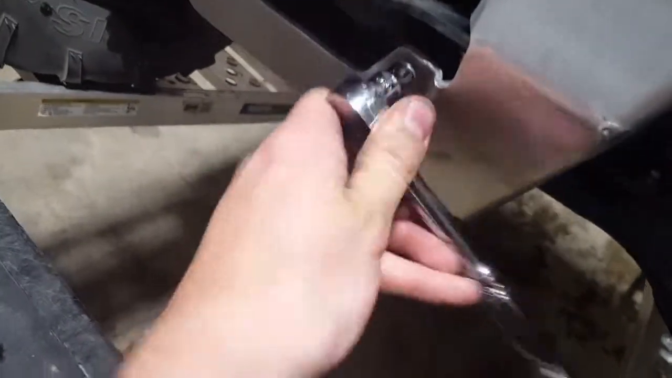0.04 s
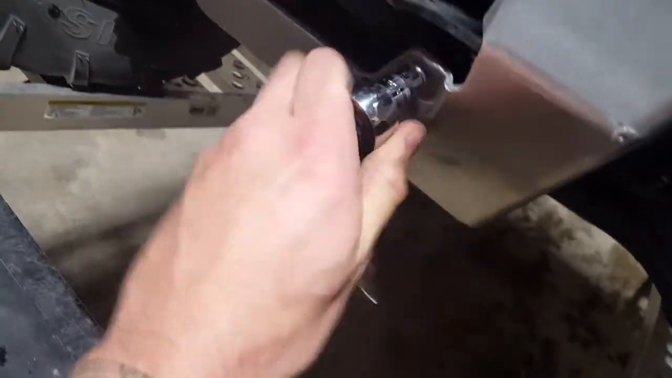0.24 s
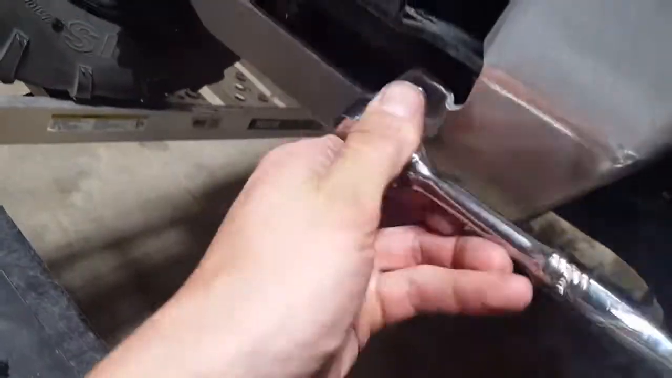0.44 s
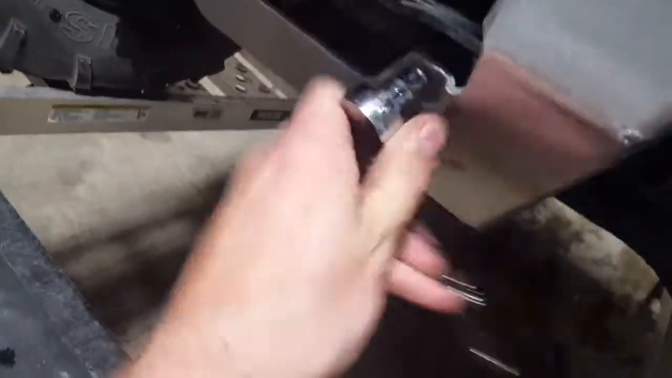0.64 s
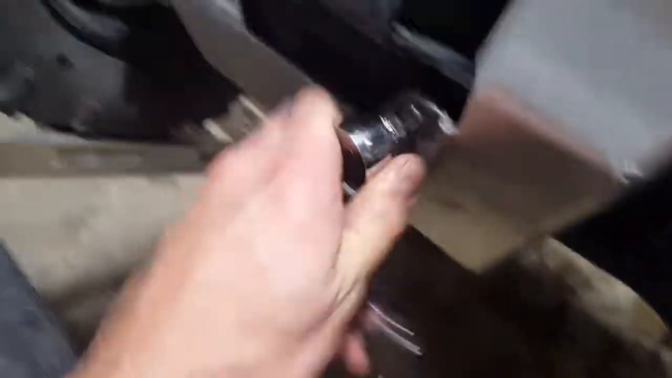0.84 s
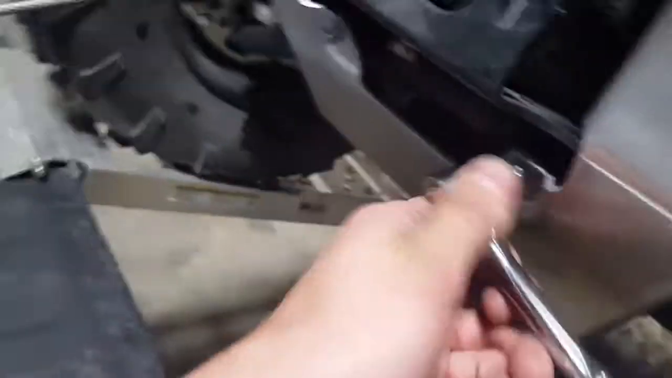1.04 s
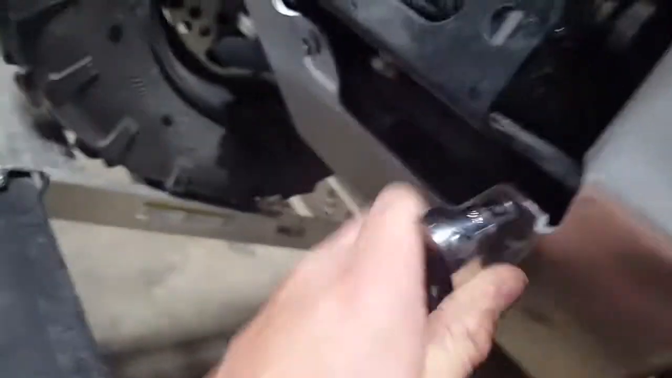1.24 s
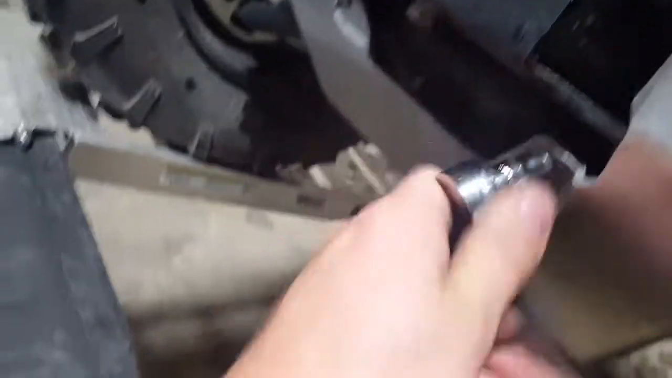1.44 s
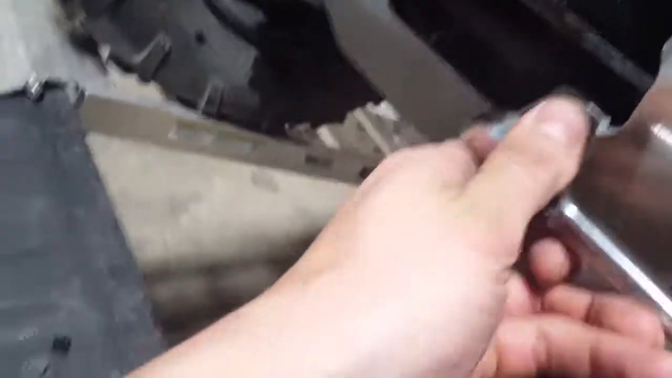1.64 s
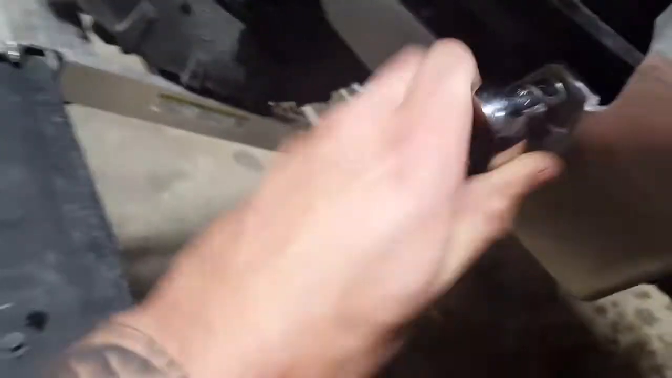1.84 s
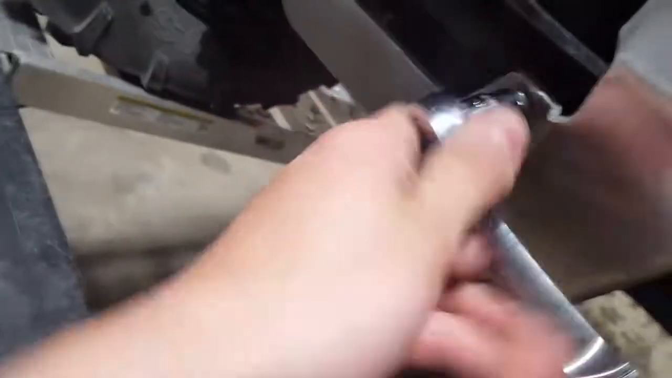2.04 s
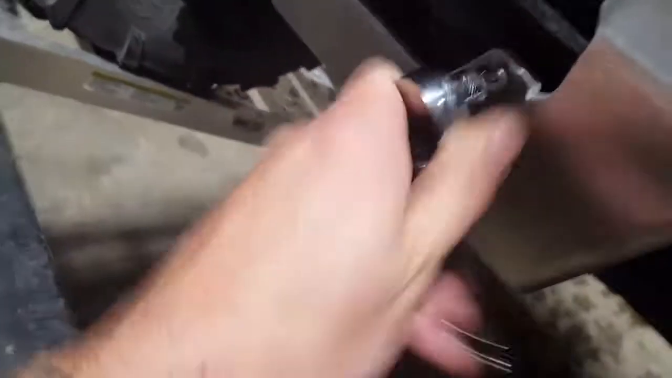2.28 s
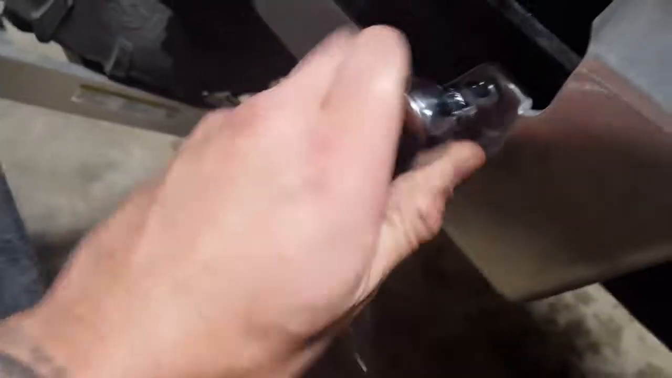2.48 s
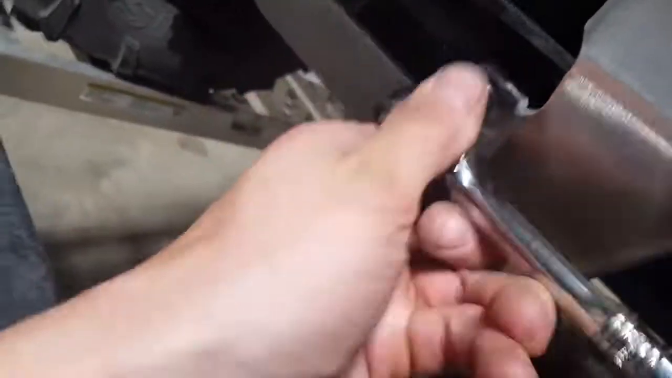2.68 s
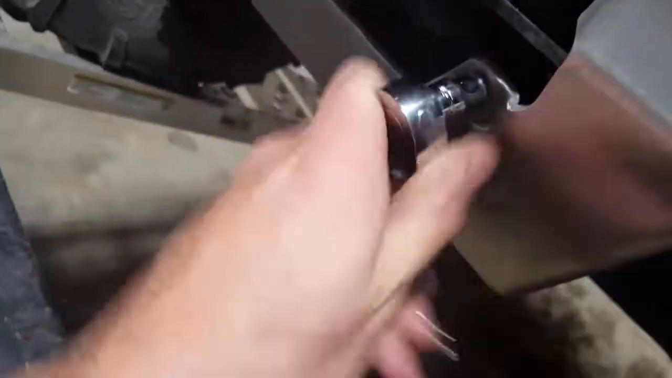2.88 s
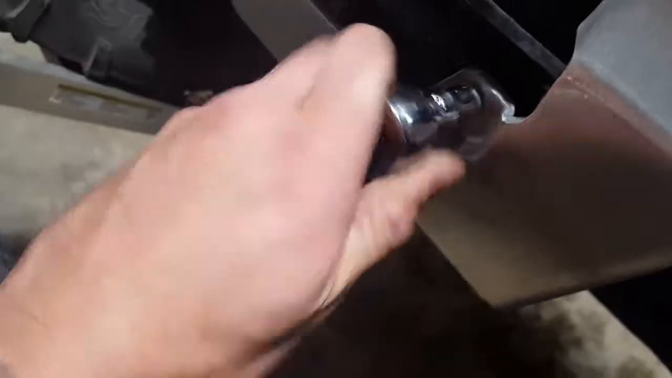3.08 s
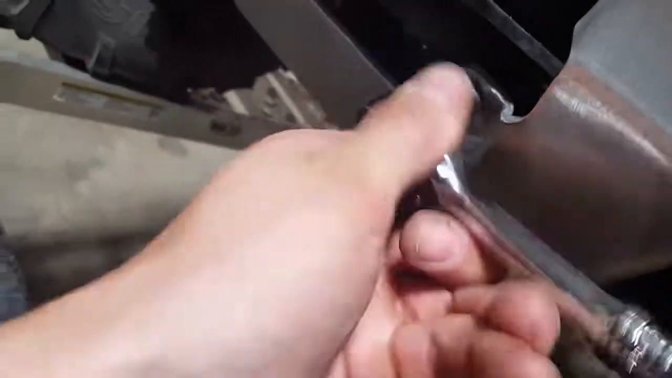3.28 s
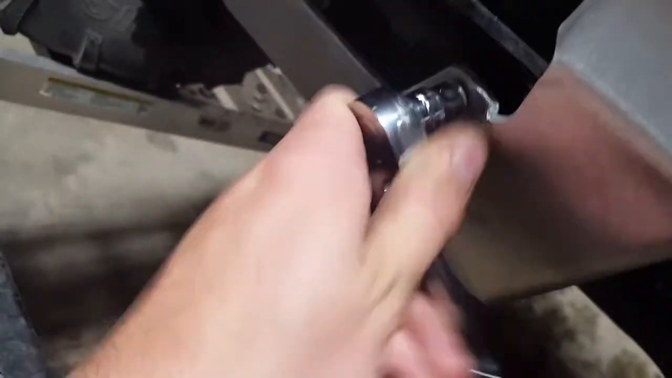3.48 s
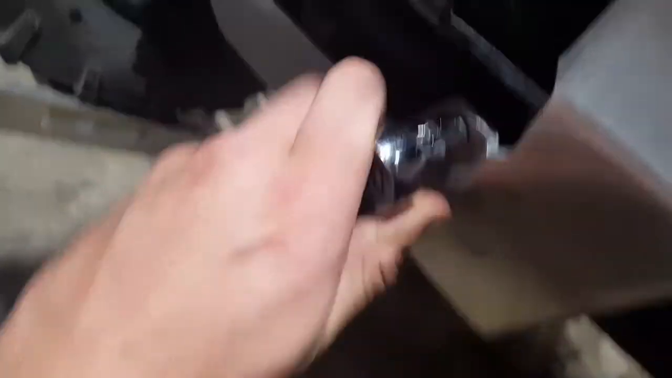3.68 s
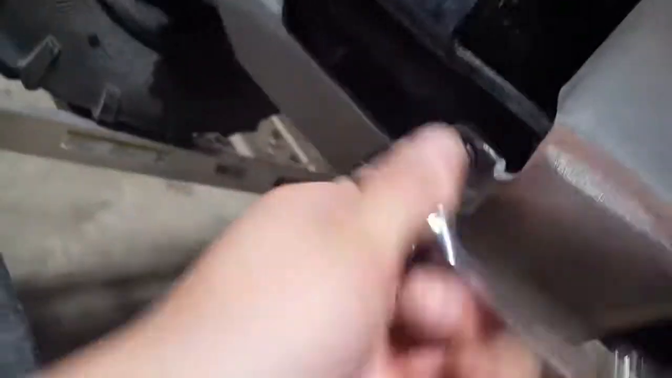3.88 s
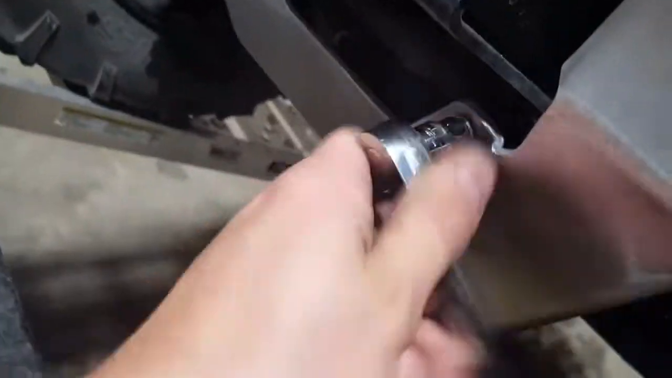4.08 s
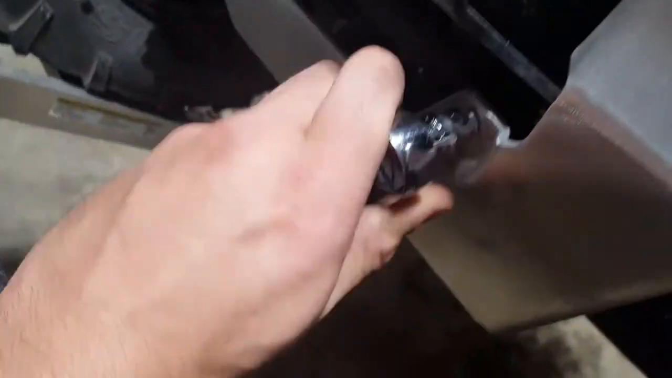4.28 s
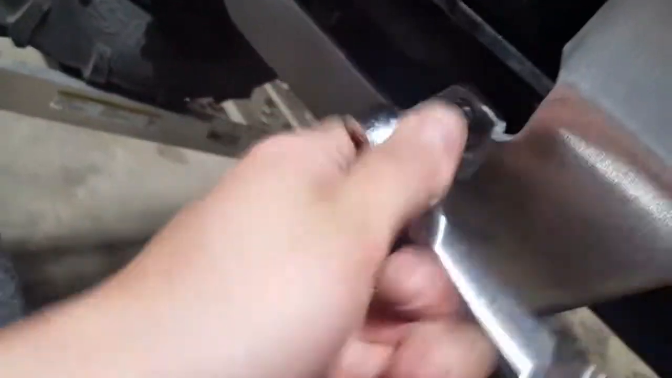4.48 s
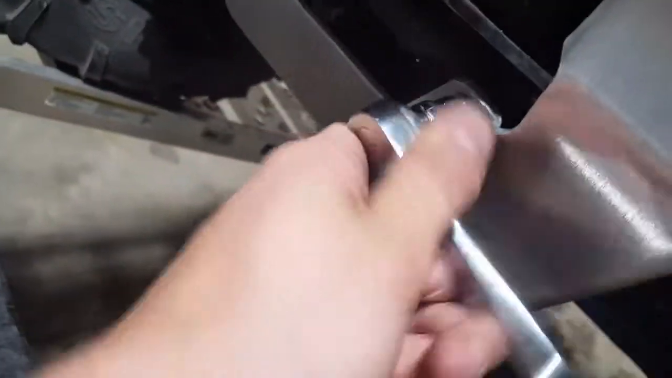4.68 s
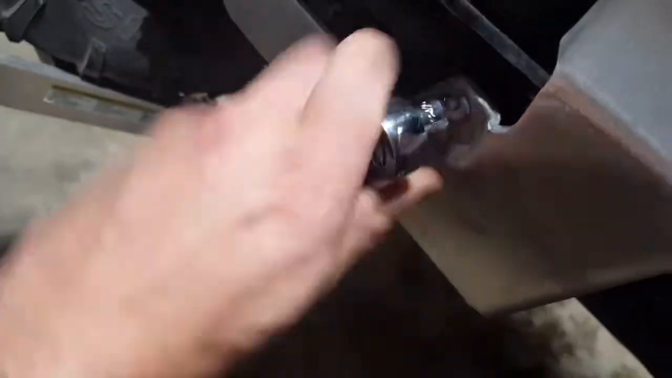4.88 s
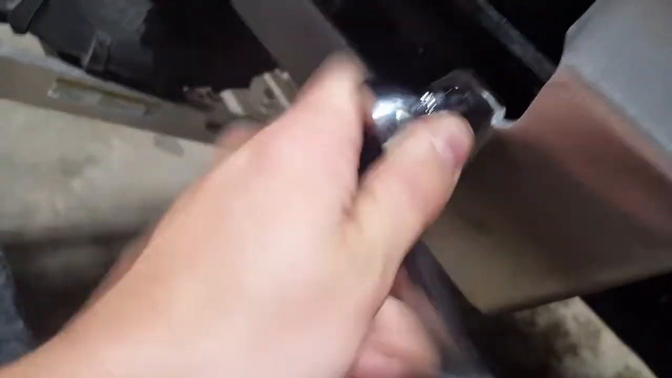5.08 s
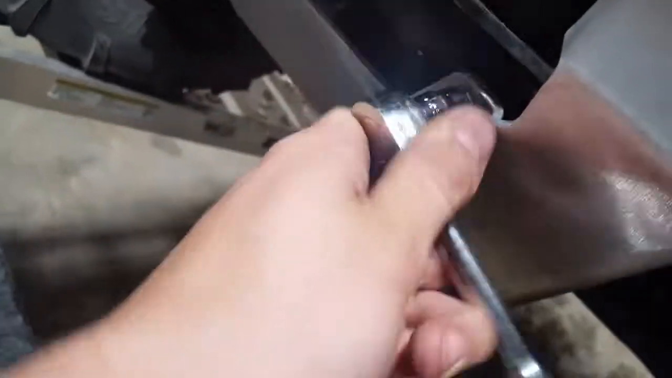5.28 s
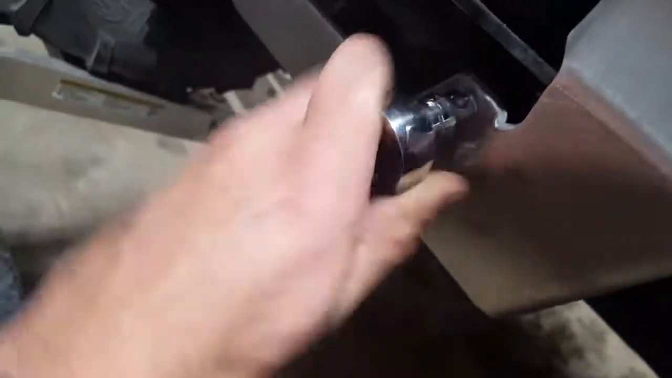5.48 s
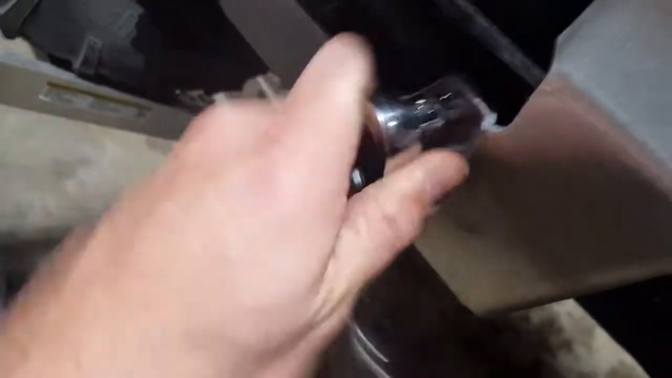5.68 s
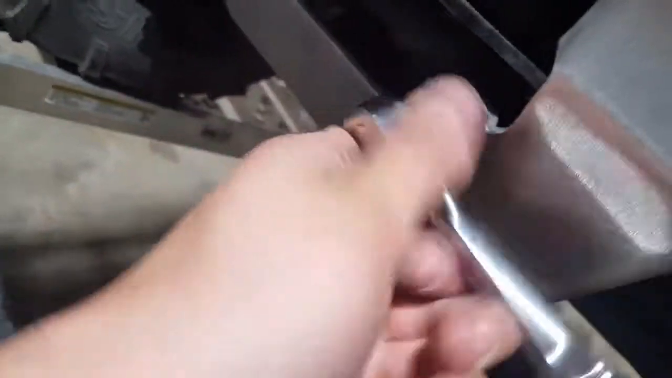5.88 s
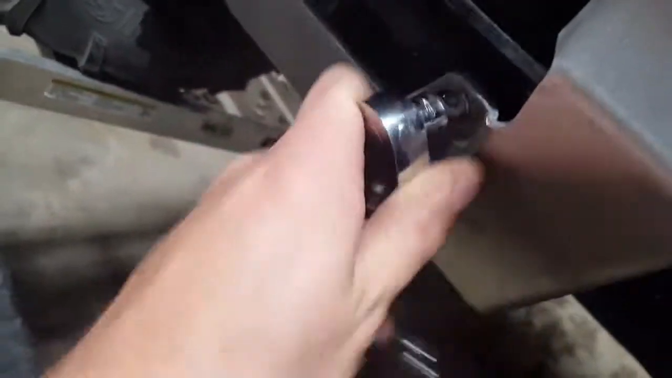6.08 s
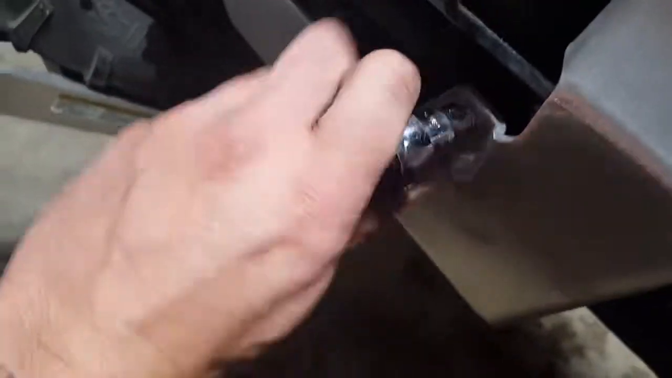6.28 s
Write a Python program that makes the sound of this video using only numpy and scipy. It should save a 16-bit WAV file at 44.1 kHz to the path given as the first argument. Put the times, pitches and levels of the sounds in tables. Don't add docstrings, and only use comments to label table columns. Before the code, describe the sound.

A socket ratchet clicks in fast metallic bursts as a bolt is tightened under a vehicle, with heavier clacks between strokes and a soft garage echo.

```python
import sys
import numpy as np
from scipy import signal
from scipy.fft import rfft, irfft, next_fast_len
from scipy.io import wavfile
from scipy.ndimage import uniform_filter1d

SR = 44100
rng = np.random.default_rng(int(sys.argv[2]) if len(sys.argv) > 2 else 0)


def output_pcm(signal):
    pcm = np.clip(np.atleast_2d(signal).T, -1, 1) * 32767
    wavfile.write(sys.argv[1], SR, np.round(pcm).astype(np.int16))


def attenuation_scalar(level_db):
    decades = np.asarray(level_db, float) / 20
    return 10 ** decades


N = 279153
SIZE = next_fast_len(N + SR)
HZ = np.fft.rfftfreq(SIZE, 1 / SR)


def evened(x):
    return x / np.sqrt(np.mean(x ** 2) + 1e-20)


def read(points, hz):
    f, value = np.transpose(points)
    return np.interp(np.log(hz + 1), np.log(f + 1), value)


def along(rows, axis):
    rows = np.array(rows)
    return np.interp(np.arange(N) / SR, rows[:, 0], rows[:, axis])


def peaks(rows):
    gain = 0
    for hz, width, db in rows:
        gain = gain + attenuation_scalar(2 * db) / (1 + (2 * (HZ - hz) / max(width, 25)) ** 2)
    return gain


def causal(gain):
    fold = irfft(np.log(gain + 1e-5), SIZE)
    fold[1:SIZE // 2] *= 2
    fold[SIZE // 2 + 1:] = 0
    return np.exp(rfft(fold))


def teeth(first, last, first_db, top_db, last_db, fastest, push_db, count):
    slow_share = 0.6
    uneven, scatter_db = 0.1, 1.13
    first_blow_db = 3.5
    u = np.linspace(0, 1, 200)
    arch = np.sin(np.pi / 2 * np.interp(u, [0, fastest, 1], [0, 1, 0]))
    angle = np.cumsum(slow_share + (1 - slow_share) * arch)
    tooth = np.arange(count)
    luck = np.clip(rng.standard_normal((count, 2)), -1.5, 1.5) * (tooth > 0)[:, None]
    place = tooth + uneven * luck[:, 0] * (tooth % (count - 1) > 0)
    at = np.interp(place / (count - 1), (angle - angle[0]) / (angle[-1] - angle[0]), u)
    end_db = np.where(at < fastest, first_db, last_db)
    tick_db = end_db + (top_db - end_db) * np.interp(at, u, arch) + scatter_db * luck[:, 1]
    blow_db = tick_db + push_db + first_blow_db * (place == 0)
    return np.c_[first + (last - first) * at, tick_db, blow_db]


def colour():
    rows = []
    for events, bright_db, deep_db in [(TURNS, -6, 1.5), (SLACK, -8.5, 4.5), (LONE_TEETH, -4, 1)]:
        delay = 0.01 if events is TURNS else 0
        for s, *_ in events:
            rows.append((s + delay, bright_db, deep_db - 4.5 + 1 * s))
    for (first, last, *_), (fastest, pawl_db, plate_db, _) in zip(RUNS, HAND):
        ends = (pawl_db - 2.5, plate_db + 4)
        middle = first + fastest * (last - first)
        rows += [(first, *ends), (middle, pawl_db, plate_db), (last, *ends)]
    return sorted(rows)


# hz [Hz], density_db [dB per Hz]
STEEL_COLOUR = [(100, -38), (200, -33), (480, -15), (862, -5.5), (1150, -12.5), (1360, -7.5), (1830, -5),
                (2120, -15), (3350, -10.5), (6280, -5.5), (8000, -10.5), (9300, -33.5), (11000, -23.5),
                (14800, -26.5)]
# mode_hz [Hz], width_hz [Hz],
# level_db [dB]
METAL_MODES = [(126, 10, -17), (169, 15, -18), (272, 23, -18), (613.4, 16.7, -7), (1013, 9.7, -6.5),
               (5810, 440, -17.5),
               (484, 12, -10), (863, 61, -3.5), (1342.7, 40, -1), (1562, 16, -11), (1822, 14.3, -9),
               (2267, 10.7, -9), (2570, 110, -10.5), (3096, 52, -2), (3650, 14, -9.5), (3600, 10, -61),
               (4203, 81, -8), (4995, 68, -7.5), (4500, 30, -1), (5820, 20, -8), (6360, 28, -3.5),
               (7800, 25, -39), (8220, 580, -15.5)]


def chatter(s, blow_db, share, lo_hz, hi_hz, rise_s, quick_t60, slow_t60, slow_db, grit_db):
    power = np.zeros(N)
    np.add.at(power, np.round(s * SR).astype(int), attenuation_scalar(2 * blow_db))
    t = np.arange(SR // 5) / SR
    snap = attenuation_scalar(2 - 60 * t / 0.0048)
    decay = attenuation_scalar(-60 * t / quick_t60) + attenuation_scalar(slow_db - 60 * t / slow_t60) + snap
    shape = (1 - np.exp(-t / rise_s)) * decay
    burst = np.sqrt(abs(signal.oaconvolve(power * share, shape ** 2)[:N]))
    grit = attenuation_scalar(grit_db * evened(uniform_filter1d(rng.standard_normal(N), size=40)))
    gain = np.sqrt(attenuation_scalar(2 * (read(STEEL_COLOUR, HZ) - 5.5)) + peaks(METAL_MODES))
    gain /= np.sqrt((1 + (lo_hz / (HZ + 1)) ** 12) * (1 + (HZ / hi_hz) ** 12))
    gain /= np.sqrt(np.mean(gain ** 2))
    sample = np.arange(N)
    since = sample - np.maximum.accumulate(sample * (power > 0))
    habit, chance = rng.standard_normal((2, 2, N))
    alike = 0.65
    impacts = alike * habit[:, since] + np.sqrt(1 - alike ** 2) * chance
    return rfft(burst * evened(grit) * impacts, SIZE) * causal(gain)


def gripped(x, patchy_db):
    hz, t, z = signal.stft(x, SR, nperseg=512)
    patches = uniform_filter1d(rng.standard_normal(z.shape[1:]), size=5, axis=0)
    patches = uniform_filter1d(uniform_filter1d(patches, size=6, axis=1), size=4, axis=1)
    return signal.istft(z * attenuation_scalar(patchy_db * evened(patches)), SR, nperseg=512)[1][:, :N]


# first_s [s], last_s [s], tick at first_db, fastest_db and last_db tooth [dB]
RUNS = [(.0013, 0.043, -25.5, -29, -27), (0.4303, 0.482, -27.5, -24.5, -27),
        (0.49, 0.5467, -22, -26.5, -30), (0.969, 1.0418, -28, -24.5, -29.5),
        (1.0897, 1.141, -28, -26, -29.5), (1.5352, 1.655, -24, -23, -26.5),
        (2.104, 2.2246, -27, -23.5, -24.5), (2.635, 2.718, -26, -24, -20.5), (2.732, 2.7912, -22, -22, -31),
        (3.27, 3.4068, -25, -22, -27), (3.8774, 3.974, -21.5, -21, -18.5),
        (3.9834, 4.057, -25.5, -21.5, -25), (4.4943, 4.5463, -25, -25, -20.5),
        (4.559, 4.65, -23.5, -22, -23.5), (5.1167, 5.188, -21.5, -23, -20),
        (5.2055, 5.3066, -26.5, -22.5, -24.5), (5.7928, 5.918, -21.5, -21.5, -19.5),
        (5.932, 5.9655, -27.5, -28, -24.5)]
TEETH_IN_RUN = [5, 7, 10, 10, 6, 18, 18, 11, 8, 20, 14, 9, 8, 14, 9, 17, 17, 4]
# fastest at [share of run], pawl against head_db [dB],
# plate against bracket_db [dB], blow against tick_db [dB]
HAND = [(0.48, -2, -6.5, 2), (0.76, 0, -11, 0.5), (.4, -1, -10, 1.5), (0.65, -2, -4, 0),
        (.25, 0.5, -4, 1.5), (.75, 2, -5, 0), (.6, 3, -7, 1), (.45, -2.5, -4.5, 2), (.35, -3, -12, 0),
        (.65, 0.5, -7, -1), (0.73, 0.5, -3.5, 0.3), (.6, 0.5, -8, 2), (0.78, 0, -3.5, 0.7),
        (.6, -0.2, -8.5, 1), (.6, -4, 0, 0), (.4, 0.5, -8, 1.9), (.85, 1.5, -2, -2), (0.46, 5, -6, -3)]
# start_s [s], tick_db [dB], blow_db [dB]
SLACK = [(0.3814, -57, -41), (0.412, -38, -32), (0.9516, -50, -32.5), (1.4729, -46, -27),
         (1.4994, -42, -32), (1.5179, -51, -33), (2.0798, -62, -36.5), (2.5696, -75, -47),
         (2.5966, -46, -43), (2.624, -46, -32.5), (3.212, -60, -53), (3.219, -40.5, -34),
         (3.8128, -76, -45), (3.853, -50, -30.5), (3.8605, -40, -31.5), (4.456, -74, -42),
         (4.4683, -50, -36), (4.4734, -34, -29.5), (5.0902, -42, -34.5), (5.1074, -52, -33),
         (5.7548, -46, -38.5), (5.777, -48, -35.5)]
# start_s [s], tick_db [dB], blow_db [dB]
LONE_TEETH = [(0.067, -29.5, -24), (0.097, -40, -28.5), (.5545, -23.5, -24), (0.5628, -25.5, -21),
              (0.5818, -29, -28.5), (1.0501, -24, -19), (1.0607, -27.5, -21), (1.0752, -26.5, -22.5),
              (1.6676, -28.5, -34), (1.6804, -21.5, -22.5), (1.6899, -38, -22), (1.7081, -29, -28),
              (2.247, -25, -26), (2.8153, -28.5, -30), (3.234, -27.5, -24), (3.243, -28.5, -23),
              (3.259, -28.5, -21), (3.422, -27.5, -26.5), (4.073, -26, -23), (4.6647, -30, -39),
              (4.6718, -23.5, -31), (5.3476, -36, -33), (6.0021, -30, -30.5)]
# start_s [s], tick_db [dB], blow_db [dB]
TURNS = [(0.125, -38.5, -32), (0.1401, -28.5, -22), (.6457, -43, -25.5), (.6504, -31.5, -24.5),
         (1.2017, -52, -52), (1.2118, -37.5, -28.5), (1.745, -43, -31), (1.754, -40, -28),
         (1.7678, -46, -34), (2.2736, -59, -37), (2.299, -59, -31), (2.308, -40, -28.5),
         (2.3142, -28, -21.5), (2.343, -62, -34), (2.861, -57, -31), (2.8741, -33.5, -25),
         (3.466, -44, -31.5), (3.4906, -49, -27), (3.5008, -29.5, -23.5), (4.105, -43, -35),
         (4.1103, -27.5, -21), (4.712, -41.5, -29), (4.7203, -28.5, -21.5), (5.365, -35, -26.5),
         (5.3718, -33, -23), (6.024, -36, -27), (6.0333, -32.5, -32), (6.0372, -24.5, -18)]
# start_s [s], tick_db [dB], blow_db [dB]
TOUCHES = [(.235, -47, -48), (.27, -45.5, -56), (.295, -47, -57), (.632, -39, -43), (.723, -40.5, -60),
           (.7853, -47, -42.5), (.89, -64, -49), (3.5751, -58, -39.5), (5.4886, -53, -40),
           (5.565, -60, -48), (6.2286, -60, -42)]


def ratchet():
    runs = []
    for run, hand, count in zip(RUNS, HAND, TEETH_IN_RUN):
        runs.append(teeth(*run, hand[0], hand[3], count))
    s, tick_db, blow_db = np.vstack([*runs, SLACK, LONE_TEETH, TURNS, TOUCHES]).T
    thud_db = blow_db - 31 + 1.88 * np.clip(blow_db - tick_db, 0, 9)
    rows = colour()
    bright = 1 / (1 + attenuation_scalar(-2 * along(rows, 1)))
    deep = 1 / (1 + attenuation_scalar(-2 * along(rows, 2)))
    frame = chatter(s, thud_db, 0.67, 107, 404, 0.0057, 0.14, 0.74, -9, 0.79)
    plate = chatter(s, blow_db - 2.5, deep, 318, 1120, 0.00085, 0.037, 0.11, -7.0, 0.55)
    bracket = chatter(s, blow_db - 2.5, 1 - deep, 1174, 2460, 0.0021, 0.059, 0.097, -5.5, 1.3)
    head = chatter(s, tick_db - 2.5, 1 - bright, 2590, 4880, 0.00045, 0.029, 0.13, -8.5, 1.0)
    pawl = chatter(s, tick_db - 2.0, bright, 5190, 17000, 0.00058, 0.035, 0.13, -8.5, 0.24)
    steel = irfft(frame + plate + bracket + head + pawl, SIZE)[:, :N]
    return rfft(gripped(steel, 1.46), SIZE)


def ports(a, b, same, lean_db, lead):
    same, lean = np.clip(same, 0, 1), attenuation_scalar(lean_db)
    turned = lean * same * np.exp(1j * lead)
    other = lean * np.sqrt(1 - same ** 2)
    mean = 0.5 * np.sqrt(abs(1 + turned) ** 2 + other ** 2)
    return irfft(np.array([turned * a + other * b, a]) / mean, SIZE)[:, :N]


# hz [Hz], t60_s [s]
GARAGE_T60 = [(150, 0.24), (600, 0.96), (1700, 1), (4500, 0.97), (9000, 0.7)]


def garage(spectrum):
    taps = np.zeros((2, SR))
    first = np.arange(800, SR - 20, 20)
    at = first + rng.integers(0, 20, (2, len(first)))
    np.put_along_axis(taps, at, rng.choice([-1., 1.], at.shape), 1)
    hz, t, z = signal.stft(taps, SR, nperseg=256)
    fade = attenuation_scalar(-60 * t / read(GARAGE_T60, hz)[:, None])
    tail = signal.istft(z * fade, SR, nperseg=256)[1][:, :SR]
    tilt = attenuation_scalar(read([(1500, -0.5), (4000, 0.1), (9000, -10.0)], HZ))
    wet = irfft(spectrum * tilt * rfft(tail / np.linalg.norm(tail[0]), SIZE), SIZE)[:, :N]
    return wet * attenuation_scalar([[-17], [-13]])


# hz [Hz], density_db [dB per Hz]
RUMBLE = [(15, -27), (25, -22.5), (88, -4.5), (167, -5), (300, -10), (705, -12), (1110, -12), (1750, -14),
          (2830, -23), (4690, -27), (8500, -35.5), (10000, -55), (14800, -41)]
# hz [Hz], likeness [0 to 1]
AIR_SAME = [(60, 0.92), (370, 0.8), (2300, 0)]
# hz [Hz], lean_db [dB]
AIR_LEAN = [(60, -1.5), (370, -3), (14400, -4)]


def air(tool):
    level_db, lumps_db = -50.5, 1.5
    lumps = evened(uniform_filter1d(uniform_filter1d(rng.standard_normal(N), size=1500), size=1500))
    swell_db = 11.6 * np.exp(-((np.arange(N) / SR - 5.64) / 0.1) ** 2)
    rumble, motor = rng.standard_normal((2, 2, N))
    motor_hum = rfft(motor * attenuation_scalar(swell_db), SIZE) * np.sqrt(peaks([(367, 44, -1.6)]))
    a, b = rfft(rumble, SIZE) * attenuation_scalar(read(RUMBLE, HZ)) + motor_hum
    pair = ports(a, b, read(AIR_SAME, HZ), read(AIR_LEAN, HZ), 0)
    loud_db = 10 * np.log10(abs(uniform_filter1d((tool ** 2).mean(0), size=3000)) + 1e-12)
    duck_db = 0.099 * np.maximum(loud_db - 9, 0)
    return attenuation_scalar(level_db + lumps_db * lumps - duck_db) * pair / np.sqrt(np.mean(pair.mean(0) ** 2))


# hz [Hz], likeness [0 to 1]
TOOL_SAME = [(150, 0.79), (600, 0.84), (1600, 0.5), (3000, 0.36), (6000, 0.61), (12000, 0.16)]
# hz [Hz], lean_db [dB]
TOOL_LEAN = [(100, -0.5), (345, -5.5), (860, -4.5), (1750, -8.5), (2250, -1), (3200, 4), (3800, -2),
             (4300, -6.5), (6800, -14.5), (9000, -7.5), (14000, -8)]
# hz [Hz], left leads [radians]
TOOL_LEAD = [(200, -0.2), (600, 0.1), (860, -0.54), (1100, 3.5), (1350, 0), (1800, 3), (2200, 1),
             (3100, -1), (3800, -8.5), (4700, -3.5), (5200, -5)]


def scene():
    a, b = ratchet()
    tool = ports(a, b, read(TOOL_SAME, HZ), read(TOOL_LEAN, HZ), read(TOOL_LEAD, HZ))
    return tool + garage(a) + air(tool)


def starved(x, from_hz, top_hz, gate_db, spread_db, lift_db):
    frames = dict(fs=SR, window=signal.windows.cosine(2048), nperseg=2048, noverlap=1024)
    start = 535
    hz, t, z = signal.stft(np.pad(x, ((0, 0), (start, 0))), **frames)
    top = hz > from_hz
    below = np.sqrt(np.mean(abs(z[:, (hz > 5000) & ~top]) ** 2, 1, keepdims=True))
    earlier = np.roll(below, 1, axis=2)
    attack = below > 3.2 * earlier
    attack |= np.roll(attack, 1, axis=2)
    bands = rng.standard_normal((2, len(hz) // 32 + 1, len(t)))
    bands = np.repeat(bands, 32, axis=1)[:, :len(hz)]
    around = np.sqrt(uniform_filter1d(abs(z) ** 2, size=32, axis=1))
    threshold = np.maximum(below, earlier) * attenuation_scalar(gate_db + spread_db * bands)
    kept = abs(z) > np.maximum(threshold, 1.5 * around)
    click_gain = attenuation_scalar(np.interp(hz, [12500, 15500], [-1.0, -9]))[:, None]
    line_gain = kept * attenuation_scalar(lift_db) * (hz < top_hz)[:, None]
    gain = np.where(top[:, None], np.where(attack, click_gain, line_gain), 1)
    return signal.istft(z * gain, **frames)[1][:, start:start + N]


def roll_off(x):
    return signal.sosfilt(signal.butter(12, 14950, fs=SR, output="sos"), x)


def record(dry):
    ceiling = 1.1
    rounded = ceiling * np.tanh(dry / ceiling)
    mix = starved(rounded, from_hz=9600, top_hz=14330, gate_db=-12, spread_db=5.0, lift_db=6.8)
    return roll_off(mix)


dry = scene()
out = record(dry)
output_pcm(out)
```